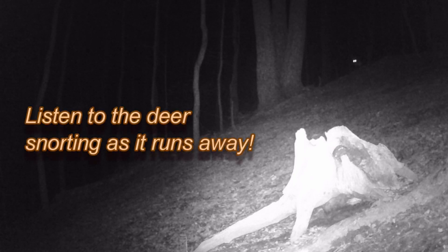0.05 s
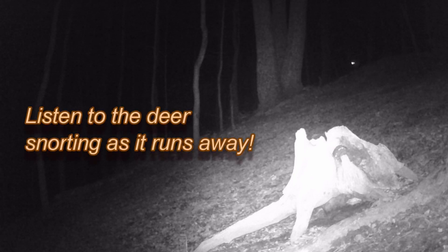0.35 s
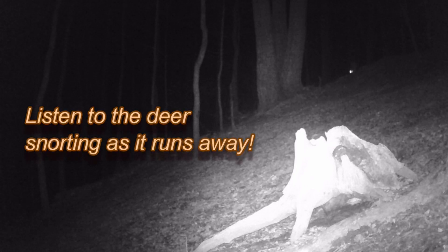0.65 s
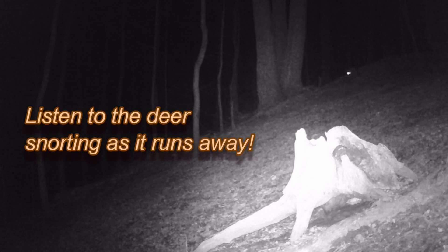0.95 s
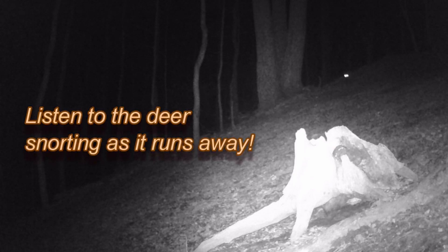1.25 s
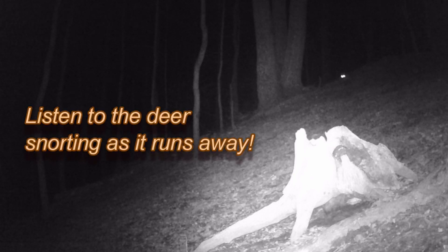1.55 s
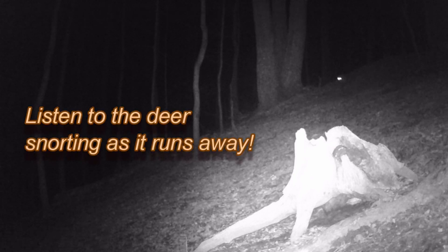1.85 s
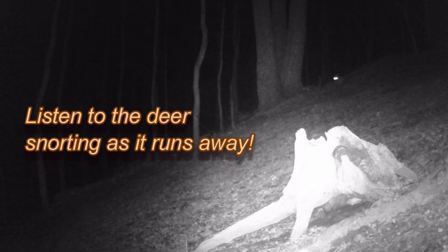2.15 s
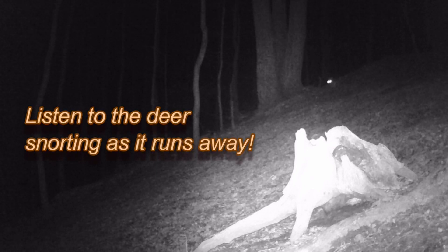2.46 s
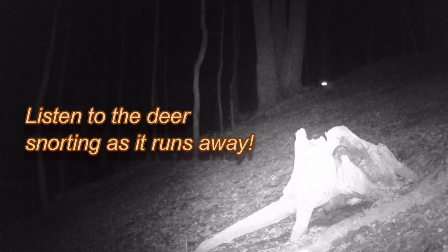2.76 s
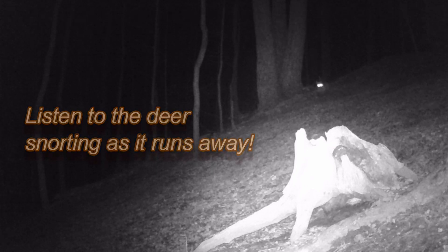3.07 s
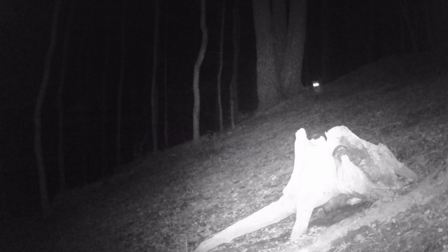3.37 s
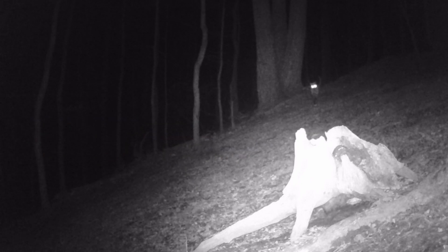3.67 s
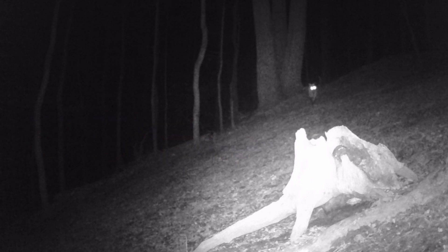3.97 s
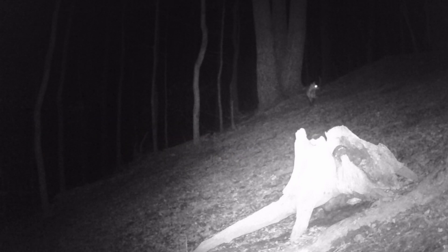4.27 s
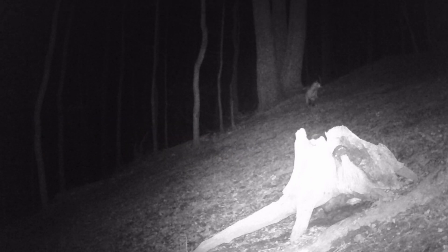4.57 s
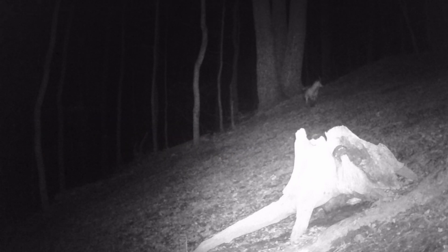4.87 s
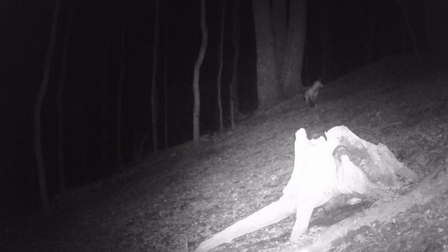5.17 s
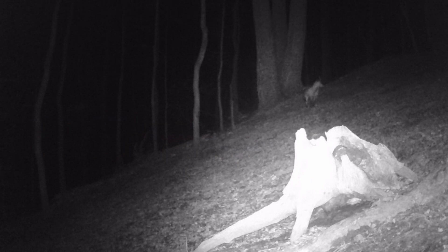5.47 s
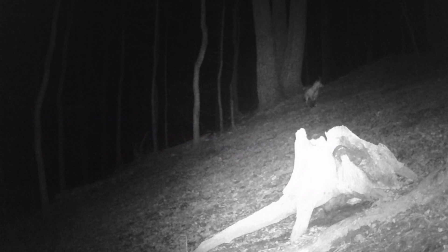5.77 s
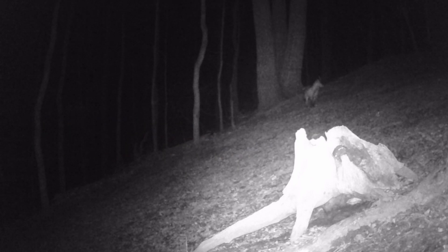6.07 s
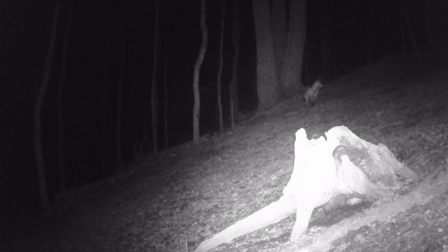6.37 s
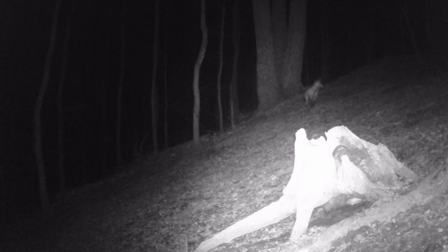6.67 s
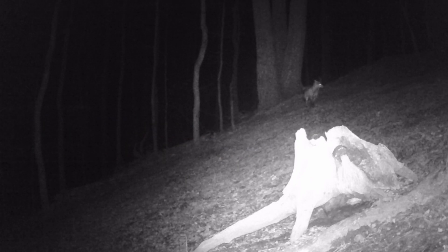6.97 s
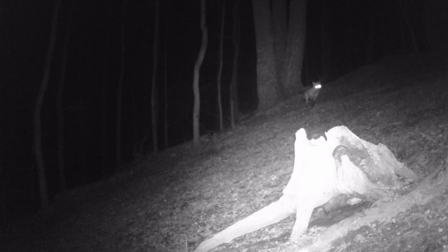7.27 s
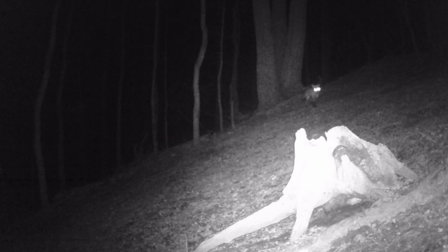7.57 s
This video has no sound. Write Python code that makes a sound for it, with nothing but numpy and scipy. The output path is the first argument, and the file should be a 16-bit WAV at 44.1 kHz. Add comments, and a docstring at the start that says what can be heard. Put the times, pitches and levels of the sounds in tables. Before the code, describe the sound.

A deer gives faint, whistling snorts at irregular intervals in a night wood, over low rumble, dull thumps and steady hiss.

```python
"""Thin swishes over a low rumble, then a deer snorts in a wood at night, some way from a trail camera.
Each snort is a blast of air with a breathy, falling nasal whistle that rings on among the trunks.
More swishes and one soft tick come between the snorts. Dull thumps reach the microphone,
and the camera hums and hisses in step with its frame rate."""
import sys
import numpy as np
from scipy import signal
from scipy.fft import rfft, irfft, next_fast_len
from scipy.io import wavfile
from scipy.ndimage import map_coordinates

SR = 44100
rng = np.random.default_rng(int(sys.argv[2]) if len(sys.argv) > 2 else 0)


def generate_wav(sig):
    """Save sig (samples, or channels by samples) to the path in sys.argv[1] as 16-bit PCM at SR."""
    pcm = np.round(np.clip(np.atleast_2d(sig).T, -1, 1) * 32767).astype(np.int16)
    wavfile.write(sys.argv[1], SR, pcm)


N = 344862
TIME = np.arange(N) / SR

# low draught at the microphone: (time [s], level [dB])
DRAUGHT_LEVEL = [(0, -35), (.24, -27.5), (.45, -35.5), (1.02, -28), (1.2, -22.5), (1.5, -30), (1.85, -27),
                 (2.35, -31.5), (2.8, -24.5), (3.15, -30), (3.75, -36), (4.05, -25), (4.6, -34.5),
                 (5, -28.5), (5.9, -32.5), (6.9, -38), (7.25, -22.5), (7.6, -34.5)]
# colour of that draught: (frequency [Hz], level [dB])
DRAUGHT_SPECTRUM = [(8, 2), (18, 4.5), (35, -4), (60, -8.5), (100, -26.5), (200, -32), (600, -95.5)]
# steady hiss behind everything in the wood: (frequency [Hz], level [dB])
FLOOR_SPECTRUM = [(20, 4), (80, 2.5), (200, -5), (400, -10.5), (700, -15.5), (1500, -20.5), (2500, -24),
                  (3000, -24.5), (3500, -34.5), (4200, -44.5), (5200, -63), (8000, -77.5)]
def night(gust_db=3.5, gust_rate=2.8):
    """A low draught that comes and goes, over a steady hiss."""
    draught_db = np.interp(TIME, *np.transpose(DRAUGHT_LEVEL)) + gust_db * wobble(gust_rate)
    return amp(draught_db) * noise(DRAUGHT_SPECTRUM) + amp(-41.5) * noise(FLOOR_SPECTRUM)


# camera electronics, right by the microphone: (frequency [Hz], level [dB])
FIZZ_SPECTRUM = [(2500, -14.5), (4000, -5), (5100, -9.5), (6000, -4), (6800, 0), (7600, -3.5), (8300, -13),
                 (8900, -28.5), (15000, -32.5)]
def fizz(frame_hz=20, flicker=0.1, surge=0.4):
    """Electronic fizz swells with every frame and a little more with every fourth."""
    frames = (TIME - .029) * frame_hz
    fourth = np.abs(np.mod(frames, 4) - 3.1) < .25
    swell = 1 + flicker * np.cos(2 * np.pi * frames) + surge * fourth
    return amp(-72) * swell * noise(FIZZ_SPECTRUM)


# hum inside the camera, on multiples of the frame rate: (frequency [Hz], rms level [dB])
HUM_LINES = [(80, -49.5), (100, -50.5), (120, -52.5), (140, -54), (160, -59.5), (180, -67), (220, -62.5),
             (360, -68), (380, -71), (560, -70)]
def hum(drift_rad=1.0, waver_db=1.8):
    """The camera's hum wavers, each line in its own way."""
    lines = np.zeros(N)
    for hz, db in HUM_LINES:
        phase = 2 * np.pi * (hz * TIME + rng.random()) + drift_rad * wobble(rate=3)
        lines += amp(db + waver_db * wobble(rate=4)) * unit(np.sin(phase))
    return lines


# dull thumps close to the microphone: (time [s], low swing [dB], knock [dB])
NEAR_THUMPS = [(2.094, -13, -24), (2.664, -19, -30), (2.774, -16.5, -34), (3.984, -13, -25),
               (4.027, -13, -19), (4.059, -15, -21), (4.311, -17, -15), (4.364, -16, -27),
               (4.421, -17, -26), (4.48, -15.5, -17), (4.699, -19.5, -38), (7.255, -9, -17)]
def thumps(swing_hz=35.9, knock_hz=87.3, decay_cycles=0.24):
    """Each thump is one low swing of pressure and a shorter knock, with hardly any ring."""
    out, t = np.zeros(N), np.arange(-SR // 8, SR // 8) / SR
    for s, swing_db, knock_db in NEAR_THUMPS:
        for hz, db in (swing_hz, swing_db), (knock_hz, knock_db):
            wave = np.sin(2 * np.pi * hz * t + rng.uniform(0, 2 * np.pi))
            add(out, s + t[0], amp(db) * wave / np.cosh(t * hz / decay_cycles))
    return out


def resonance(hz, centre, width):
    """Response of one damped resonance, 1 at its centre."""
    return 1j * hz * width / (centre ** 2 - hz ** 2 + 1j * hz * width)


# rings of the opening in front of the microphone: (frequency [Hz], width [Hz], level [dB])
PORT_RINGS = [(2885, 37, -6), (3160, 24, -8.5)]
def port(hz):
    """The small opening in the camera's case adds a thin ring to sharp sounds."""
    return 1 + sum(amp(db) * resonance(hz, centre, width) for centre, width, db in PORT_RINGS)


# echo of the wood around the camera: (frequency [Hz], time to fall 60 dB [s])
WOOD_DECAY = [(200, 0.83), (950, 1.2), (3000, 1.8), (8000, 0.67)]
def trunks(x, build_s=0.018):
    """Sound scattered by the trees builds up, then dies at its own speed for each frequency."""
    hz, t, spectra = signal.stft(rng.standard_normal(SR), SR, nperseg=256)
    fade = amp(-60 * t / along(WOOD_DECAY, hz)[:, None]) * (1 - np.exp(-t / build_s))
    tail = signal.istft(spectra * fade, SR, nperseg=256)[1]
    return signal.fftconvolve(x, tail / np.linalg.norm(tail))[:N]


# rush of breath from some way off, also the tick's raw noise: (frequency [Hz], level [dB])
AIR_SPECTRUM = [(400, -36), (800, -15.5), (1150, 2.5), (1420, -3), (1750, 0.5), (2050, -5), (2450, -4.5),
                (2950, -4), (3400, -15.5), (4200, -28.5), (5500, -60.5)]
def tick(at_s=1.6):
    """A short crunch in one broad resonance, like a twig under a hoof."""
    crunch = unit(filtered(noise(AIR_SPECTRUM), lambda hz: resonance(hz, centre=1830, width=550)))
    return amp(-47) * burst(TIME - at_s, length=.028, attack=.018, release=.014) * crunch


# thin swishes off among the trees: (time [s], length [s], level [dB])
FAR_SWISHES = [(-.02, 0.13, -50), (.662, 0.037, -50.5), (.767, 0.084, -51), (0.895, 0.32, -58.5),
               (1.963, .07, -53.5), (2.474, 0.13, -51), (3.377, 0.25, -61)]
# their colour at that distance: (frequency [Hz], level [dB])
SWISH_SPECTRUM = [(700, -36), (1400, -9.5), (2300, -9.5), (2700, -1.5), (2950, 1.5), (3200, -5),
                  (3600, -13.5), (4300, -29), (5500, -55)]
def swishes(grain_db=2, lag_s=0.043, linger_s=.03, release_s=0.027):
    """Short, grainy swells of high hiss: one trails each snort, others come as the deer moves."""
    swells, t = np.zeros(N), np.arange(SR // 2) / SR
    for s, length, *_, hiss_db in DEER_SNORTS:
        add(swells, s + lag_s, amp(hiss_db) * burst(t, length + linger_s, attack=.05, release=release_s))
    for s, length, db in FAR_SWISHES:
        add(swells, s, amp(db) * burst(t, length, attack=.02, release=release_s))
    hiss = unit(noise(SWISH_SPECTRUM) * amp(grain_db * wobble(rate=200)))
    return amp(-2) * swells * hiss


# colour the deer's nose gives the overtones: (frequency [Hz], level [dB])
NOSE_RESPONSE = [(1700, -7.5), (1950, -7.5), (2200, 2.5), (2650, -2.5), (2950, -3.5), (3250, -13),
                 (3600, -17)]
# the deer, some way from the microphone: (time [s], length [s], rise [s], whistle [dB], pitch [Hz],
# fall of pitch [0-1], overtone gain [dB], rush of air [dB], trailing hiss [dB])
DEER_SNORTS = [(1.169, .066, .03, -41, 1151, 0.14, -17, -43.5, -51.5),
               (1.261, .082, 0.047, -38.5, 946, 0.05, -23, -52, -56),
               (1.696, .12, .02, -42, 1036, .13, -26, -53, -56),
               (2.539, 0.064, 0.028, -36, 993, .045, -12.5, -47.5, -50),
               (2.921, 0.06, 0.016, -41.5, 900, .075, -8, -49.5, -63),
               (3.934, 0.056, 0.04, -39.5, 1052, 0.12, -19.5, -50.5, -53.5),
               (4.012, 0.028, 0.025, -44.5, 912, 0.23, -16, -60, -60.5),
               (4.358, 0.073, .019, -44.5, 964, 0.2, -20, -56.5, -59),
               (5.048, 0.0634, 0.053, -35.5, 1016, .06, -19, -52, -53.5),
               (5.452, 0.19, 0.023, -39.5, 1092, 0.08, -13.5, -56.5, -56.5),
               (7.241, 0.19, 0.16, -41, 940, 0.06, -17, -57, -56)]
def snorts(flutter_db=2.5, waver=.45, release_s=0.024, sag_curve=1.59):
    """Air forced through the nostrils rushes and whistles; the whistle holds, then sinks ever faster."""
    whistles, blast, t = np.zeros(N), np.zeros(N), np.arange(SR // 2) / SR
    for s, length, rise, db, hz, fall, overtone_db, air_db, _ in DEER_SNORTS:
        pressure = burst(t, length, rise, release_s) * amp(flutter_db * wobble(rate=97, count=len(t)))
        pitch = hz * (1 - fall * np.minimum(t / length, 1) ** sag_curve)
        # turbulence shakes and spreads the whistle: the further it falls, the rougher and breathier
        width_hz = 47 + 460 * fall
        eddy_share = 0.092 + 3.6 * fall
        shake = waver * width_hz * wobble(rate=260, count=len(t))
        phase = 2 * np.pi * np.cumsum(pitch + shake) / SR
        eddies = wobble(rate=400, count=len(t)) * np.cos(phase)
        eddies += wobble(rate=320, count=len(t)) * np.sin(phase)
        overtones = sum(amp(along(NOSE_RESPONSE, k * pitch)) * np.sin(k * phase) for k in (2, 3))
        tone = np.sin(phase) + eddy_share * eddies + amp(overtone_db) * overtones
        add(whistles, s, amp(db) * pressure * unit(tone))
        add(blast, s, amp(air_db) * pressure)
    return amp(-4.5) * whistles + amp(-0.5) * blast * noise(AIR_SPECTRUM)


def scene():
    """The distant deer and its echo, over the sounds near the camera."""
    deer = snorts() + swishes() + tick()
    distant = filtered(amp(-1) * deer + amp(-7) * trunks(deer), port)
    return (distant + thumps() + night() + hum() + fizz())[None]


def record(dry, top_hz=15700):
    """The camera keeps nothing above its band limit."""
    return np.array([filtered(channel, lambda hz: hz < top_hz) for channel in dry])


def amp(db):
    """Decibels to gain."""
    return 10 ** (np.asarray(db) / 20)


def unit(x):
    """Scale to rms 1."""
    return x / np.sqrt(np.mean(np.abs(x) ** 2) + 1e-20)


def along(points, hz):
    """(Hz, value) points read on a log axis."""
    f, v = np.transpose(points)
    return np.interp(np.log(hz + 1), np.log(np.abs(f) + 1), v)


def filtered(x, response):
    """x times a response of frequency."""
    size = next_fast_len(len(x) + SR // 4)
    return irfft(rfft(x, size) * response(np.fft.rfftfreq(size, 1 / SR)), size)[:len(x)]


def noise(spectrum):
    """Coloured noise of rms 1."""
    return unit(filtered(rng.standard_normal(N), lambda hz: amp(along(spectrum, hz))))


def wobble(rate, count=N):
    """A smooth random curve, rate knots a second."""
    knots = rng.standard_normal(8192)
    return map_coordinates(knots, [np.arange(count) * rate / SR], mode="wrap")


def burst(t, length, attack, release):
    """A smooth rise, a hold and an exponential fall."""
    rise = np.sin(np.pi / 2 * np.clip(t / attack, 0, 1)) ** 2
    return rise * np.exp(-np.maximum(t - length, 0) / release)


def add(track, s, sound):
    """Mix a sound into the track from time s on."""
    start = round(s * SR)
    part = sound[max(-start, 0):N - start]
    track[max(start, 0):][:len(part)] += part


dry = scene()
out = record(dry)
generate_wav(out)
```